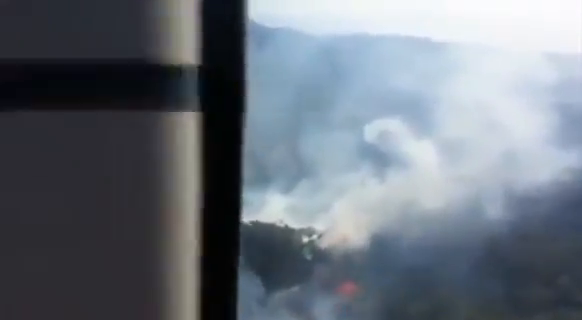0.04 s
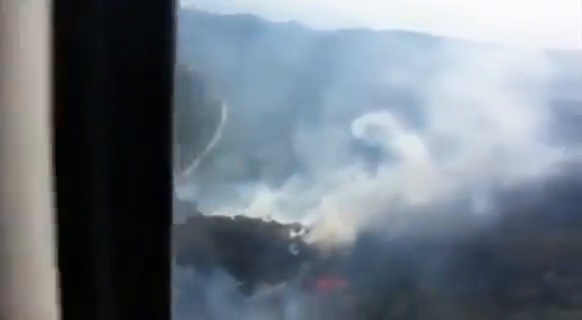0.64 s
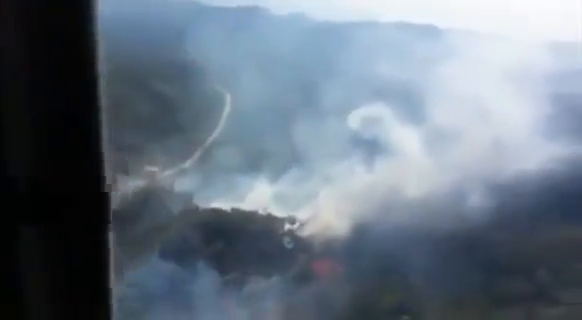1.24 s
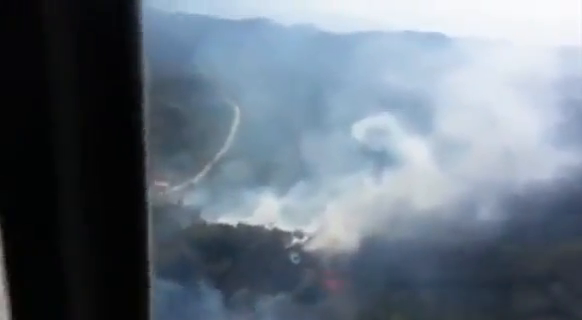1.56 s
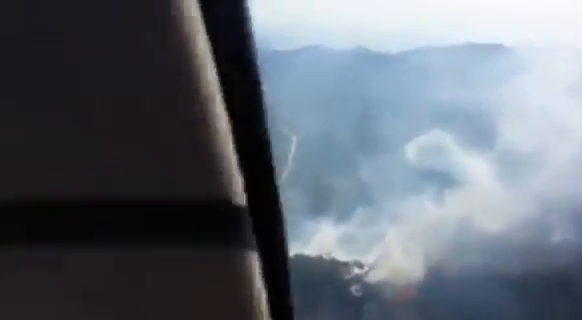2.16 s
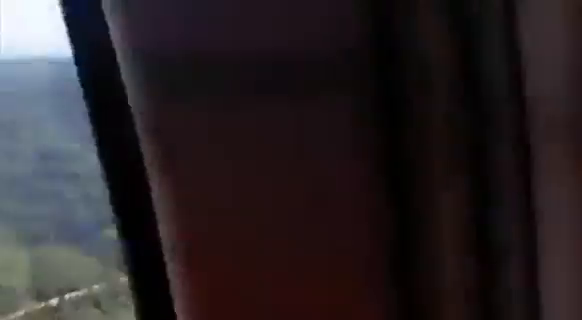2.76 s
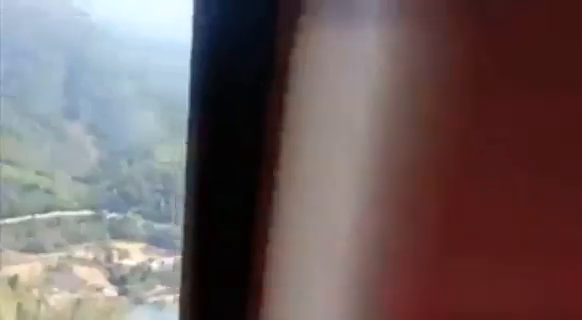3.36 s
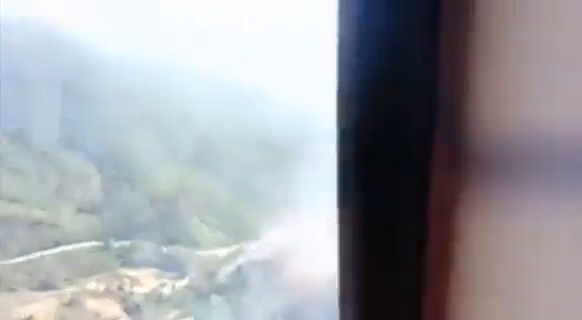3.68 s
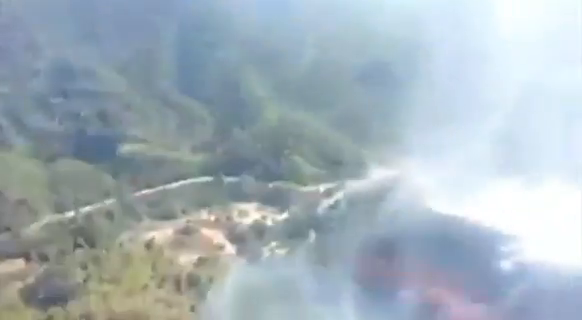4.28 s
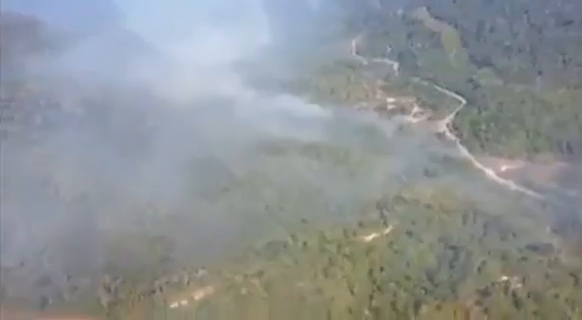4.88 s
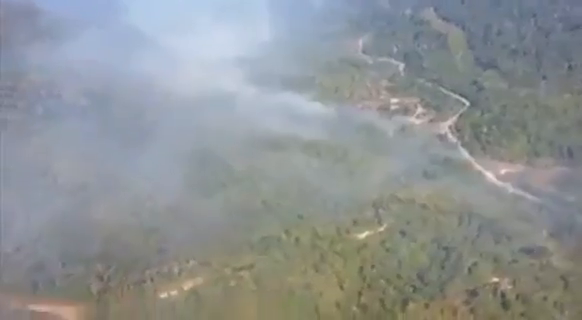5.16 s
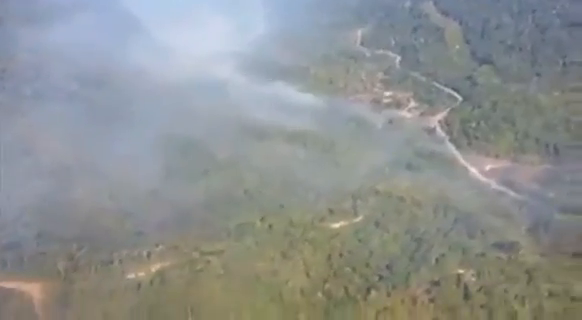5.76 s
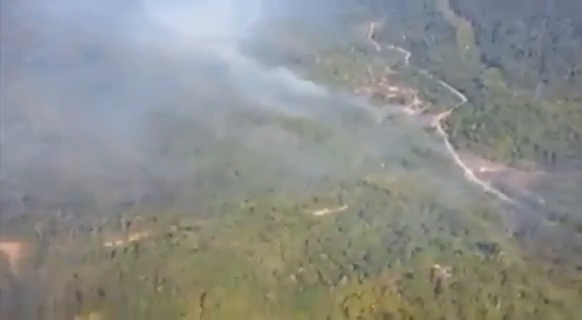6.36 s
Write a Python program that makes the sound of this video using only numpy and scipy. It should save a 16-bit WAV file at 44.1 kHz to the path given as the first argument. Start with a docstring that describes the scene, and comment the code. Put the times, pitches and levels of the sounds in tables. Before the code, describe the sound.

A helicopter in level flight is heard from inside the cabin, loud and continuous for about six and a half seconds. A strong, high gear whine leads, with a second, higher whine and several thin tones around it, all nearly steady in pitch. Underneath, the rotors drum in a fast, low throb, and air rumbles and hisses along the body, swelling in small gusts around 0.5, 1.2 and 1.6 seconds. The whines waver in strength and shift between the ears as the hand-held microphone moves, mostly leaning right. From about 2.3 seconds the microphone turns and the higher whine becomes stronger. Thin, shrill tones swell briefly near 3.2 and 4.7 seconds. At about 4.9 seconds the sound changes abruptly to another seat in the cabin: the rotor drumming is heavier and the air slightly fuller, while the whine carries on to the end.

```python
"""Helicopter cabin in level flight

Gear teeth whine on mesh tones that share one shaft speed and throb with the blades. The rotors drum
under the gusty rumble and hiss of air on the skin. Two microphones listen from three poses in the
cabin's standing waves: at the window, turned away after about 2 s, at another seat from 4.87 s."""
import sys
import numpy as np
from scipy import signal
from scipy.fft import rfft, irfft
from scipy.io import wavfile

SR = 44100
rng = np.random.default_rng(int(sys.argv[2]) if len(sys.argv) > 2 else 0)


def inscribe(sig):
    """Save sig as 16-bit PCM at rate SR to the path in sys.argv[1].

    A 1-D sig is mono; a 2-D sig holds one channel per row.
    Samples are clipped to [-1, 1] before scaling.
    """
    pcm = np.round(np.clip(np.atleast_2d(sig).T, -1, 1) * 32767)
    wavfile.write(sys.argv[1], SR, pcm.astype(np.int16))


N = 287532
TIME = np.arange(N) / SR
BINS_HZ = np.arange(N // 2 + 1) * SR / N
SIDES = np.array([[.5], [-.5]])  # splits an L-R difference
BLADE_HZ, TAIL_HZ = 24.75, 96.6
SEAT_S, TURN_LENGTH_S = 4.872, .33


def undb(db):
    """Decibels to gain."""
    return 10 ** (np.asarray(db) / 20)


def curves(table):
    """Columns of a time table, per sample."""
    t, *columns = np.transpose(table)
    return [np.interp(TIME, t, c) for c in columns]


def on_bins(table):
    """Columns of a frequency table, per FFT bin."""
    hz, *columns = np.transpose(table)
    return [np.interp(np.log(np.maximum(BINS_HZ, 1)), np.log(hz), c) for c in columns]


def flutter(hz):
    """Unit-variance wavering, rolling off above hz."""
    x = irfft(rfft(rng.standard_normal(N)) / (1 + (BINS_HZ / hz) ** 2), N)
    return x / x.std()


def bell(peak_s, half_s, squareness=2):
    """Swell from 0 to 1 and back; squarer is more abrupt."""
    return np.exp(-np.abs((TIME - peak_s) / half_s) ** squareness)


def by_spot(window, seat):
    """Window value, then a 10 ms ramp to the other seat's."""
    return window + (seat - window) * np.clip((TIME - SEAT_S) * 100, 0, 1)


def by_pose(window, turned, seat, mid_turn_s=1.52):
    """Glide from window to turned value, then step to the other seat's."""
    turn = np.clip((TIME - mid_turn_s) / TURN_LENGTH_S + .5, 0, 1)
    return by_spot(window + (turned - window) * turn, seat)


# Gusts: peak t/s, half-length/s, then gain/dB at each of GUST_HZ
GUSTS = [(.48, 0.1, 3.4, 4.1, 1.8, 8.5, 3.5), (1.17, 0.13, 1, 3, 1.8, 5.1, 6),
         (1.62, 0.26, .8, 2.5, 1.8, 0.2, 6.5), (4.45, .45, 1.2, 2.3, 0.8, 1, -1.5),
         (5.36, 0.29, 2.5, .8, 2.1, 2.5, 2), (6.46, 0.057, 2.3, 1.4, 0, -1, -1)]
GUST_HZ = (170, 600, 3540, 5100, 6800)


def gust_db(hz):
    """Level added by gusts around one frequency."""
    return sum(np.interp(np.log(hz), np.log(GUST_HZ), gains_db) * bell(t, half_s, squareness=3.6)
               for t, half_s, *gains_db in GUSTS)


# Base airflow spectrum: f/Hz, left density/(dB re 1/Hz), right density/(dB re 1/Hz)
AIR_SPECTRUM = [(20, -64, -67), (38, -60, -63.5), (56, -46, -53.5), (96.5, -44.5, -45), (247, -47.5, -46),
                (414, -52.5, -53), (746, -59.5, -57.5), (1080, -61, -60), (1230, -55.5, -55),
                (1655, -67.5, -62), (2240, -60.5, -56.5), (3230, -73, -64), (4250, -65.5, -59.5),
                (5530, -71.5, -62.5), (6900, -64, -70.5), (8030, -69.5, -78)]
# Airflow coherence: f/Hz, L-R correlation
AIR_COHERENCE = [(20, 0.74), (100, 0.78), (300, 0.92), (500, 0.61), (900, 0.19), (1500, 0), (8000, 0)]
# Cabin resonances and dips: f/Hz, half-width/Hz, gain/dB
CABIN_MODES = [(859, 55, -4), (944, 49, 4.5), (1100, 38, -5.5), (1880, 48, 2), (2000, 56, -6),
               (2190, 72, 4), (2430, 85, -3), (3340, 29, 2.5), (3780, 48, -1), (5120, 180, 1),
               (5900, 150, 0), (6470, 90, -1.5)]
# Airflow bands: f/Hz, window gain/dB, turned gain/dB, seat gain/dB, blade chop depth
AIR_BANDS = [(70, -1, -1.7, 0.76, 0), (170, -4.5, 0.05, 0.28, .1), (600, -1.1, -1.5, 1.2, 0.05),
             (2500, -2.7, 0, 0.97, 0.11), (3540, 3, -6.5, -2.4, 0.11), (5260, -2, -2.3, 0, 0.07),
             (6900, -0.1, -3.5, -.5, 0.02)]


def airflow(shaft, flicker_db=1.28, mid_turn_s=2.07, shaded_above_hz=3000):
    """Turbulence on the skin: shared rumble, independent hiss, gusting and chopped by the downwash."""
    coherence = np.clip(on_bins(AIR_COHERENCE)[0], -1, 1)
    mid, side = rfft(rng.standard_normal((2, N)))
    noise = mid * np.sqrt(1 + coherence) + 2 * SIDES * side * np.sqrt(1 - coherence)
    cabin_db = sum(db / (1 + ((BINS_HZ - hz) / width) ** 2) for hz, width, db in CABIN_MODES)
    spectrum = noise * undb(on_bins(AIR_SPECTRUM) + cabin_db) * np.sqrt(SR) / 2
    masks = on_bins(np.c_[[band[0] for band in AIR_BANDS], np.eye(len(AIR_BANDS))])
    downwash = np.cos(2 * np.pi * BLADE_HZ * shaft)
    out = 0
    for mask, (hz, *pose_db, chop) in zip(masks, AIR_BANDS):
        swell_db = gust_db(hz)
        left_db = right_db = by_pose(*pose_db, mid_turn_s) + swell_db
        if hz > shaded_above_hz:  # left microphone is shaded from the window
            left_db = by_pose(-1.6, .05, .8, mid_turn_s) + .35 * swell_db
        gain = undb(np.array([left_db, right_db]) + flicker_db * flutter(13))
        out += gain * (1 + chop * downwash) * irfft(spectrum * mask, N)
    return out


# Accessory lines: f/Hz, window level/dB, seat level/dB, L-R/dB
ACCESSORY_LINES = [(555, -43, -48, -3), (576.5, -41, -45, -7), (1573, -47, -49, -3), (1831, -49, -54, -6),
                   (1863, -47, -49, -6), (2258, -52, -41, -8), (2734, -44, -47, -9), (3478, -47, -52, -9),
                   (3709, -49, -46, -6), (4102, -44, -40, -7), (5561, -46, -42.5, -6), (6226, -53, -54, -3),
                   (6573, -49, -52, -3), (6831, -50, -50, 5), (6950, -53, -51, 7)]


def accessories(shaft):
    """Pumps, fans and overtones: thin lines fading in and out."""
    out = 0
    for hz, window_db, seat_db, pan_db in ACCESSORY_LINES:
        fading = 1 + .28 * (flutter(3.4) + 1j * flutter(1.8))
        line = np.real(fading * np.exp(2j * np.pi * (hz * shaft + rng.random((2, 1)) / 3)))
        out += undb(by_spot(window_db, seat_db) + SIDES * pan_db) * line
    return out


# Standing-wave crests: t/s, half-length/s, f/Hz, gain/dB
CRESTS = [(0.502, 0.09, 350, 7), (0.616, 0.25, 1236, 6.5), (.68, 0.23, 4005, 6), (1.135, .09, 617, 8),
          (1.13, 0.11, 1160, 7.5), (1.27, 0.16, 4005, 4), (2.48, 0.051, 97, 7), (2.75, .3, 1236, 2),
          (3.152, .35, 4531, 11.5), (3.25, 0.34, 97, 3.5), (4.7, .2, 4005, 12.5), (4.75, 0.093, 1236, 3.5),
          (5.6, 0.39, 4005, 9.5), (5.653, 0.28, 1236, 3.5)]


def crest_db(hz):
    """Level added to a tone as the microphones cross crests of its standing wave."""
    return sum(db * bell(t, half_s) for t, half_s, tone_hz, db in CRESTS if abs(tone_hz / hz - 1) < .055)


# Main rotor: blade-rate harmonic, window base level/dB, seat base level/dB
ROTOR_HARMONICS = [(1, -53, -55), (2, -44, -41.5), (3, -38.5, -35.5), (4, -37, -47), (5, -42, -45),
                   (6, -36.5, -25.5), (7, -39, -30), (9, -35, -43), (10, -38, -23.5), (11, -44, -46),
                   (18, -57, -43), (21, -54.5, -37)]


def rotors(shaft, waver_db=1.9, pan_db=2.5, smear_cycles=.1, in_step_s=2.47):
    """Blade passes drum the cabin; the tail rotor beats against their fourth harmonic."""
    spin = shaft - in_step_s
    tail_db = by_pose(-31, -29.5, -31.5) + crest_db(TAIL_HZ) + gust_db(TAIL_HZ) + waver_db * flutter(3)
    out = undb(tail_db) * np.cos(2 * np.pi * TAIL_HZ * spin)
    push_db = 1.9 * gust_db(GUST_HZ[0]) - 2.5  # other seat drums harder in a gust
    for harmonic, window_db, seat_db in ROTOR_HARMONICS:
        db = by_spot(window_db, seat_db + push_db) + waver_db * flutter(3.2)
        # near-aligned harmonics form a slap, smeared by the cabin
        cycles = harmonic * BLADE_HZ * spin + smear_cycles * rng.standard_normal()
        out += undb(db) * np.cos(2 * np.pi * cycles)
    return np.sqrt(2) * out * undb(SIDES * pan_db)


def mesh_tone(shaft, hz, lead_rad, throb, rough, scatter):
    """Tooth mesh: blades load it, uneven contact widens it, scattered paths vary it per microphone."""
    blade = np.exp(2j * np.pi * (BLADE_HZ * shaft + rng.random()))
    load = 1 + throb * (blade + .5 * blade.conj())
    contact = rough * (flutter(45) + 1j * flutter(45))
    paths = scatter * np.array([flutter(6.7) + 1j * flutter(14) for _ in range(2)])
    phase = 2 * np.pi * (hz * shaft + rng.random()) + SIDES * lead_rad
    return np.sqrt(2) * np.real((load + contact + paths) * np.exp(1j * phase))


# Weak gears: f/Hz, window L-R/dB, window left lead/rad, seat L-R/dB, seat left lead/rad, throb depth
WEAK_GEARS = [(349.8, -2.6, 0, -1.3, -.1, .08), (617.3, 1.5, .3, 2.2, 1.1, .08),
              (1160, -9.5, -2.4, -13, -.9, .06), (1235.7, -5, -1.9, -14, .6, .2),
              (4005.5, -9.9, -1.5, 5.6, -1, .06), (4531, -8.9, 0, -8.7, 0, .04)]
# Same gears: window level/dB, turned level/dB, seat level/dB
WEAK_GEAR_LEVELS = [(-27, -25, -25.5), (-39.5, -30.5, -37.5), (-31, -36.5, -31), (-31, -31, -27.5),
                    (-36.5, -45.5, -44), (-48, -44.5, -50)]


def weak_gears(shaft, sway_db=1.46):
    """Minor gear and shaft tones, swelling as the hand-held microphones sway."""
    out = 0
    for gear, pose_db in zip(WEAK_GEARS, WEAK_GEAR_LEVELS):
        hz, window_pan_db, window_rad, seat_pan_db, seat_rad, throb = gear
        pan = undb(SIDES * by_spot(window_pan_db, seat_pan_db))
        pan /= np.sqrt(np.mean(pan ** 2, axis=0))
        db = by_pose(*pose_db) + crest_db(hz) + sway_db * flutter(1.8)
        tone = mesh_tone(shaft, hz, by_spot(window_rad, seat_rad), throb, rough=.14, scatter=.1)
        out += undb(db) * pan * tone
    return out


# Lower stage: t/s, left level/dB, right level/dB, left lead/rad
LOWER_WHINE = [(0, -19.0, -9.4, 2.2), (0.33, -18.4, -9.5, 2.3), (0.46, -28.8, -12.6, 3.8),
               (0.52, -16.1, -19.4, 2.5), (0.56, -12.3, -11.8, 1.4), (0.73, -26.3, -8.2, -0.1),
               (1.18, -13.6, -13.1, -2.4), (1.35, -18.8, -11.6, -2.7), (1.55, -12.8, -10.0, -2.4),
               (1.64, -11.4, -11.4, -3.15), (2.3, -12.8, -14.0, -3.05), (2.66, -15.6, -13.4, -1.4),
               (3.65, -23.2, -11.5, -0.9), (4.0, -20.5, -14.9, -2.2), (4.85, -22.6, -13.0, -2.7),
               (4.9, -14.1, -11.3, -2.4), (5.35, -15.5, -19.9, -3.0), (6.2, -13.5, -11.7, -2.5),
               (6.5, -15.7, -15.4, -2.5)]
# Upper stage: t/s, left level/dB, right level/dB
UPPER_WHINE = [(0, -29.5, -27), (0.5, -25.5, -27.7), (0.9, -36, -30.5), (1.3, -27.4, -26.5),
               (1.36, -39, -24.5), (1.65, -37.2, -24.5), (2.33, -38.5, -16), (2.6, -27.5, -21.0),
               (2.95, -36, -15.5), (3.5, -35.5, -20), (4.1, -32.5, -15.5), (4.85, -32.5, -19.5),
               (5.2, -40, -22.5), (6.1, -33, -22.5), (6.5, -39, -30)]
# Its octave: t/s, left level/dB, right level/dB
OCTAVE_WHINE = [(0, -41, -26.4), (0.25, -44, -34.5), (0.47, -37.5, -23), (0.98, -51.5, -32.5),
                (1.1, -36, -24), (1.27, -33.5, -23), (1.36, -37.5, -33.5), (2.1, -37.5, -34.5),
                (2.95, -43, -22), (3.7, -42, -26.5), (4.3, -30, -33), (4.65, -40, -22.5), (5.05, -36, -32),
                (5.3, -29.5, -24), (5.6, -37, -27.5), (5.9, -39.8, -23.5), (6.5, -37.6, -23)]


def main_gears(shaft, lower_hz=1366.7, upper_hz=2191.3, mid_turn_s=2.4):
    """Two loud stages and the upper one's octave; the moving microphones cross their nodes."""
    *lower_db, lower_rad = curves(LOWER_WHINE)
    upper_rad = by_pose(-2.4, -.9, -1.9, mid_turn_s)
    octave_rad = by_pose(0, -1.9, -.8, mid_turn_s)
    lower = mesh_tone(shaft, lower_hz, lower_rad, throb=.04, rough=.065, scatter=.035)
    upper = mesh_tone(shaft, upper_hz, upper_rad, throb=.13, rough=.082, scatter=.099)
    octave = mesh_tone(shaft, 2 * upper_hz, octave_rad, throb=.1, rough=.11, scatter=.18)
    return (undb(lower_db) * lower
            + undb(curves(UPPER_WHINE)) * upper
            + undb(curves(OCTAVE_WHINE)) * octave)


# Shaft speed: t/s, offset from nominal/%
SHAFT_SPEED = [(0, .03), (2.7, .02), (3.25, -.14), (4.35, .26), (4.85, .24), (4.9, .04), (5.7, .04),
               (6.2, -.09)]


def scene():
    """Gears, accessories and rotors on one governed shaft, plus airflow."""
    speed = 1 + curves(SHAFT_SPEED)[0] / 100
    shaft = np.cumsum(speed) / SR  # rotation in seconds at nominal speed
    return main_gears(shaft) + weak_gears(shaft) + accessories(shaft) + rotors(shaft) + airflow(shaft)


def record(dry):
    """Soft peak limiting, then a steep low-pass."""
    ceiling, cutoff_hz = .95, 7985
    rounded = dry / (1 + (dry / ceiling) ** 6) ** (1 / 6)
    return signal.sosfilt(signal.ellip(12, .2, 80, cutoff_hz, fs=SR, output="sos"), rounded)


dry = scene()
out = record(dry)
inscribe(out)
```